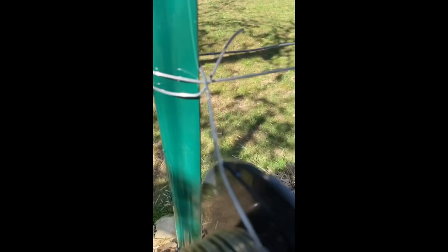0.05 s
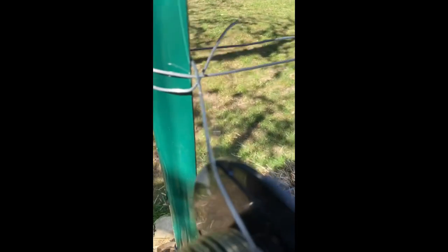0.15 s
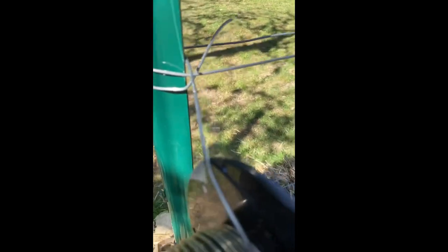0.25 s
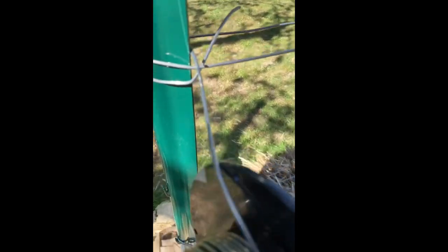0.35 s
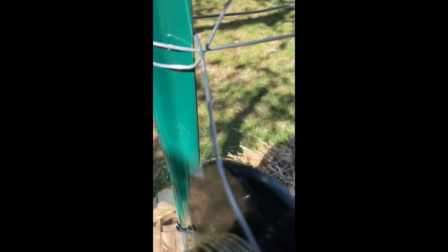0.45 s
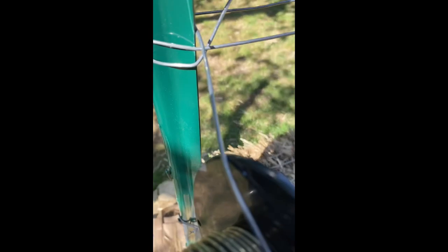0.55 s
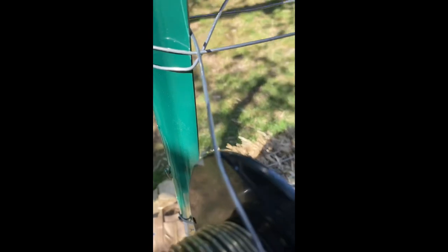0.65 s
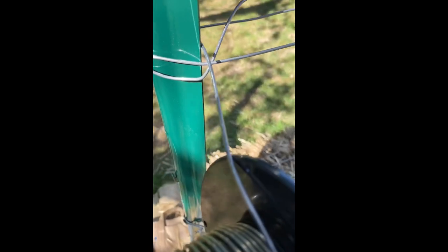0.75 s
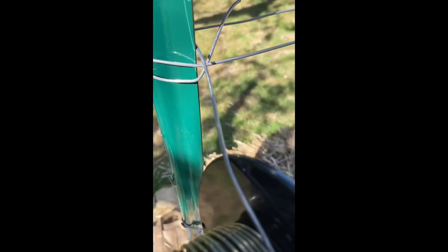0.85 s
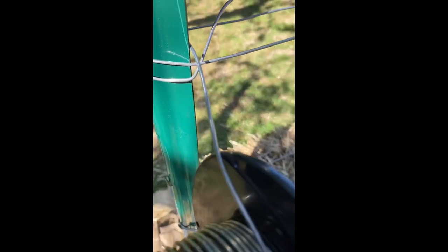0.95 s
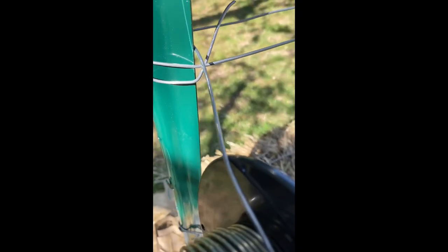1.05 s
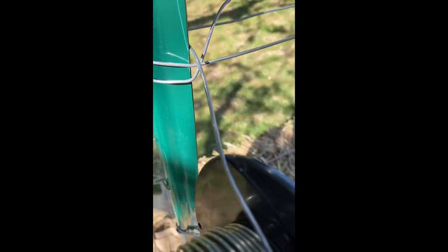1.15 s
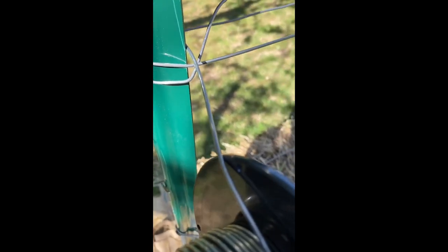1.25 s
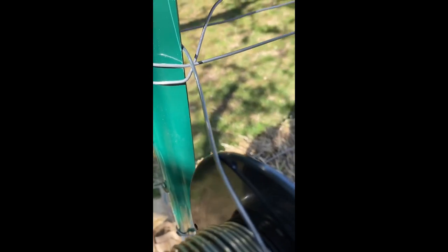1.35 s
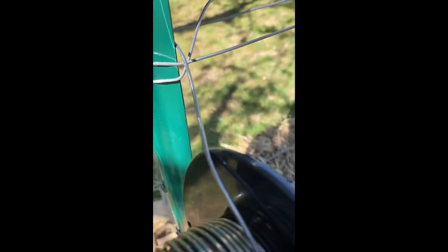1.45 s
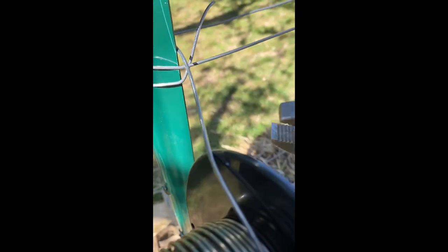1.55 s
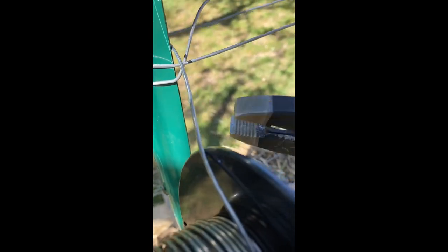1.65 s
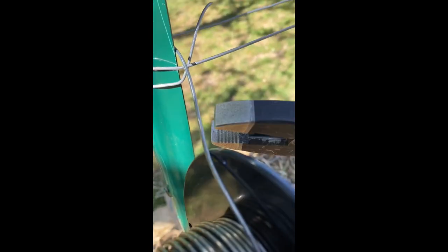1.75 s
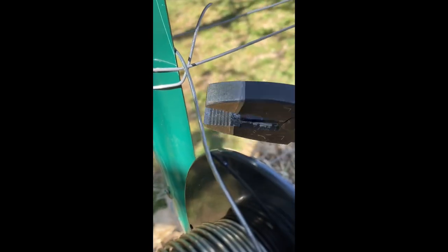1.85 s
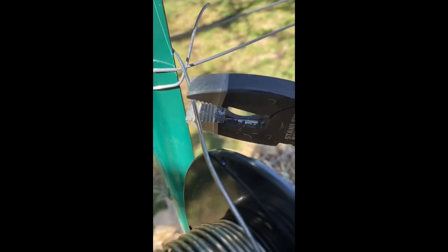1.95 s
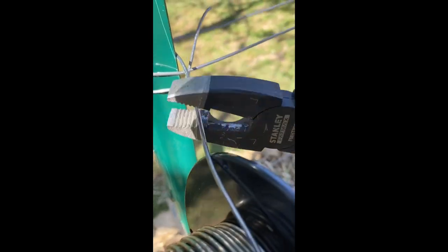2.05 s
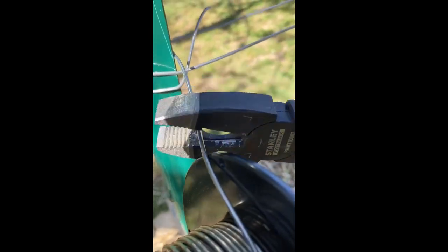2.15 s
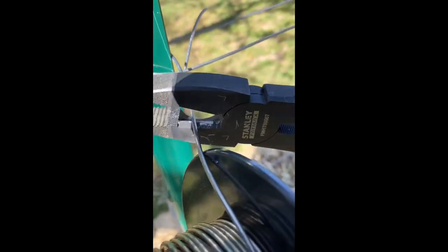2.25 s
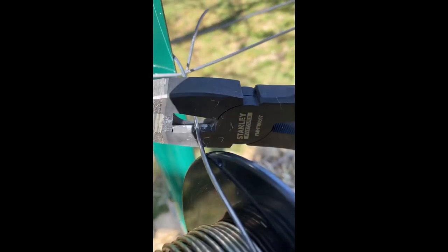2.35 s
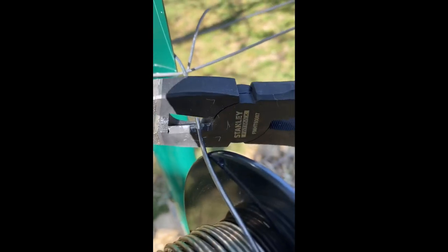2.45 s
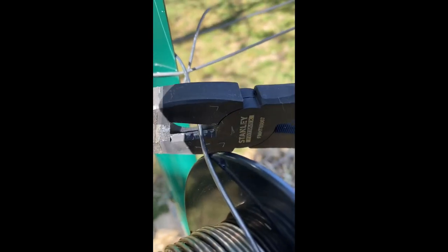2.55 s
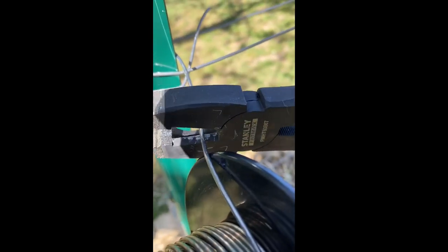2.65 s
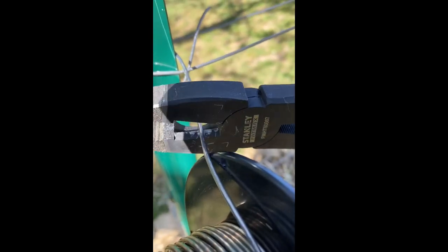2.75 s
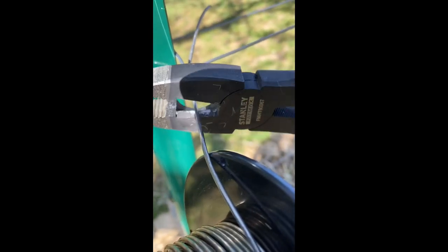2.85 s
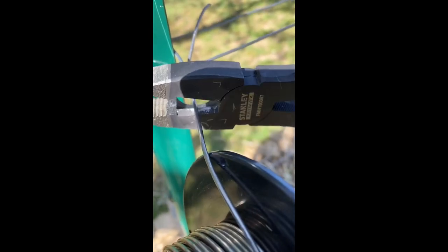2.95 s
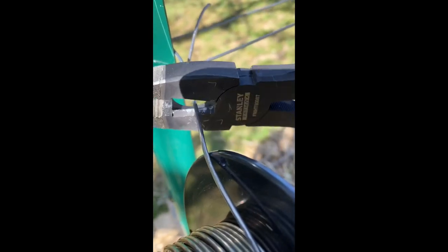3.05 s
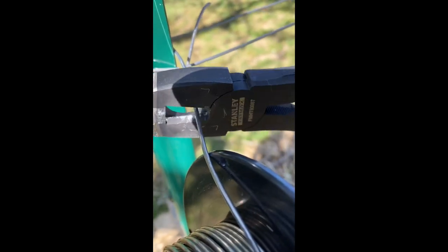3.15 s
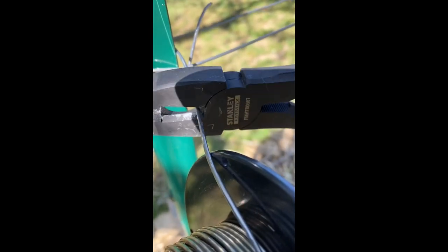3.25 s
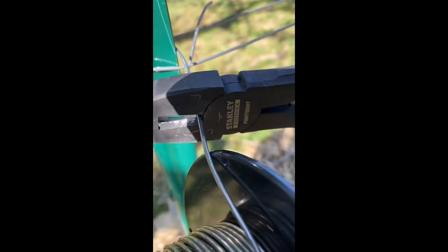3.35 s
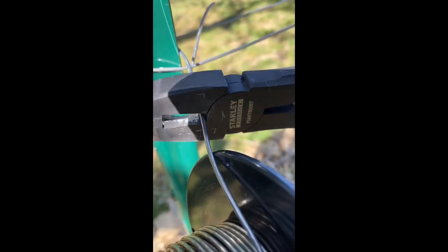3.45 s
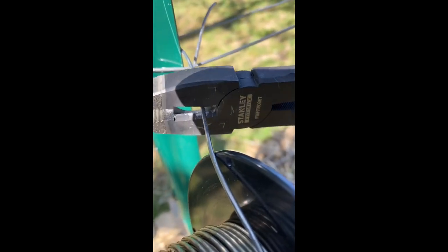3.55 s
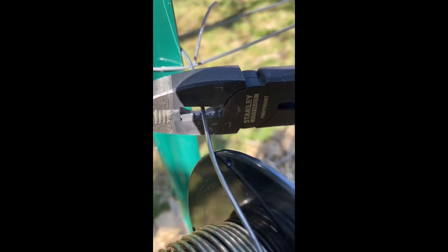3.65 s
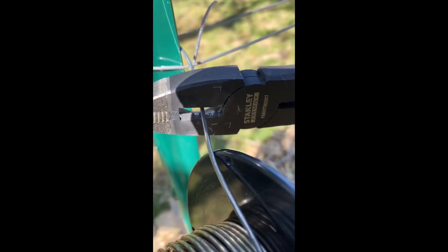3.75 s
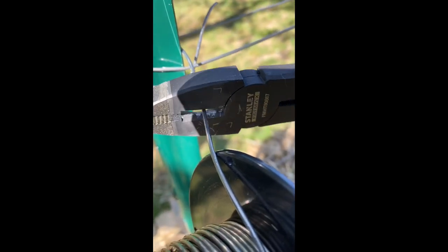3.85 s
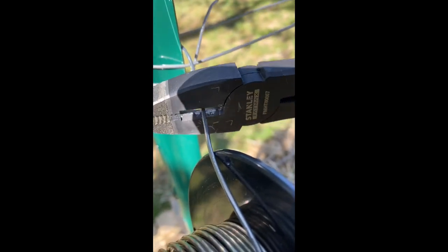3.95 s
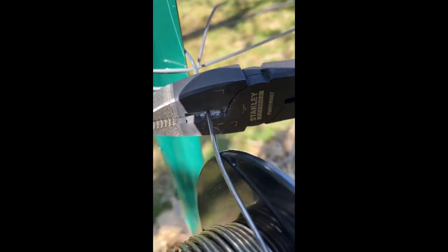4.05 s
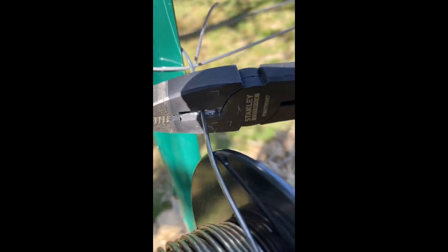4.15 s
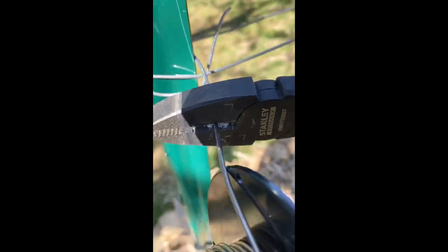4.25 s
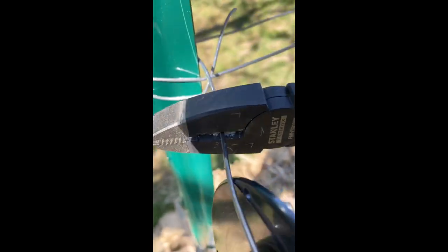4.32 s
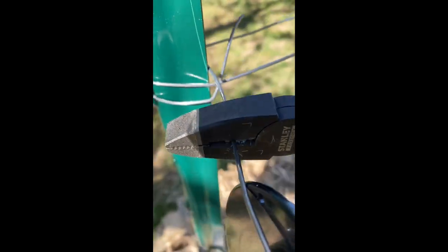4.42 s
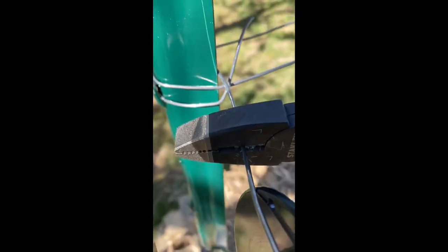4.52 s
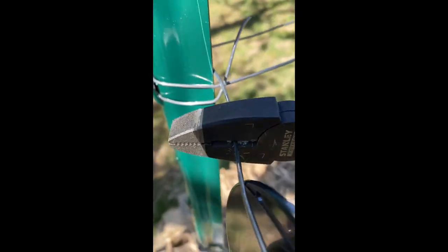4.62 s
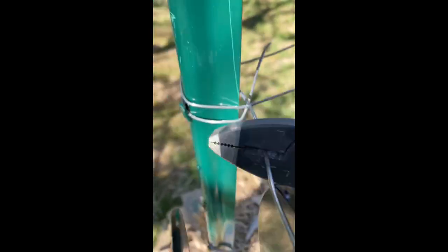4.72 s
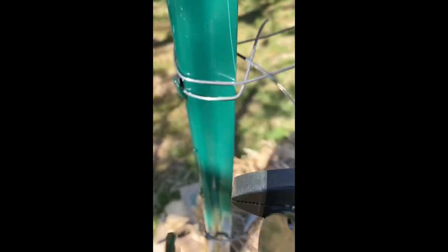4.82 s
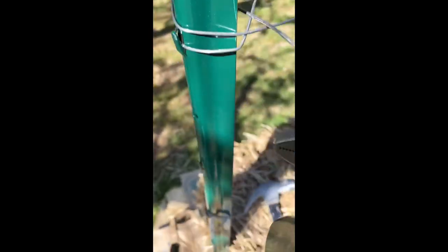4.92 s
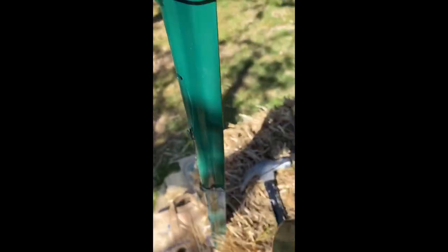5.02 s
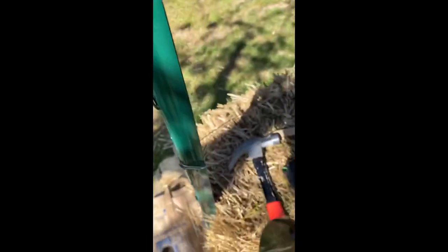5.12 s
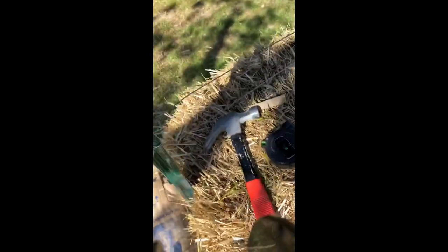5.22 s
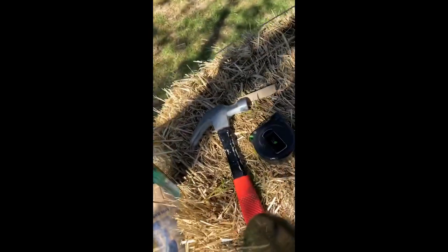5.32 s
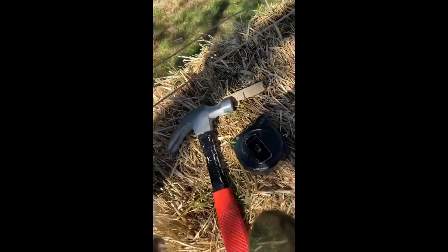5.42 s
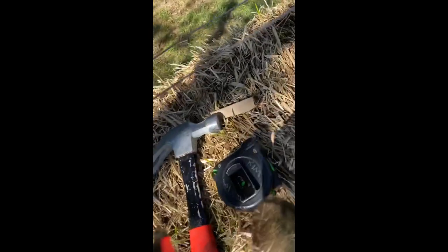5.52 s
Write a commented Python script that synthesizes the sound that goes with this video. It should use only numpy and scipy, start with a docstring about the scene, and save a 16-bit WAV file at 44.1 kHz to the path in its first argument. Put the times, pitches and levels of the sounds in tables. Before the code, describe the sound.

Quiet breeze and small metallic ticks as jaws grip a taut wire, then a violent bright crack with a low thump and fading wiry shimmer.

```python
"""A steel fence wire parts in the jaws of pliers with one loud snap: damped modes, crack noise and a low thump.
The freed fence then sings on as a bank of slowly decaying, wavering modes with a denser wash beneath.
Jaw knocks and gritty scrapes, made of shaped noise and pings, also ring the metal post beside the wire.
Behind them lie a soft rustle, low rumbles and a light breeze of filtered noise, outdoors by a hand-held phone.
Gain control ducks the level at once and lets it recover steadily."""
import sys
import numpy as np
from scipy import signal
from scipy.fft import rfft, irfft, next_fast_len
from scipy.io import wavfile
from scipy.ndimage import uniform_filter1d

SR = 44100
rng = np.random.default_rng(int(sys.argv[2]) if len(sys.argv) > 2 else 0)


def pcm_store(signal):
    """Save signal as 16-bit PCM."""
    levels = np.round(np.clip(np.atleast_2d(signal), -1, 1) * 32767)
    wavfile.write(sys.argv[1], SR, levels.astype(np.int16).T)


N = 246189
T = np.arange(N) / SR  # time, s
TOP_HZ = 16000  # upper band limit


# The wire cracks, yields and parts, and the jaws slam shut and chatter:
# start_s [s], ring_db [dB, before uneven striking], crack_db [dB, before a 2.5 dB cut], crack_t60_s [s]
BREAK_STAGES = [(4.7492, -27, -19, 0.02), (4.7553, -21.5, -29.5, 0.019), (4.7599, -12, -12.5, 0.032),
                (4.7622, -7.5, 4, 0.055), (4.7665, -0.5, 5, 0.096), (4.7721, -4, -7.5, 0.035),
                (4.7793, -7, -5.5, 0.053), (4.7875, -14, -15, 0.038)]
# Modes of the pliers: frequency_hz [Hz], relative_level_db [dB], t60_s [s]
PLIERS_MODES = [(3490, -6.5, 0.11), (3564, -7.5, 0.2), (3940, -6.5, 0.08), (4120, -4, 0.11),
                (4300, -3, 0.13), (4470, -4.5, 0.096), (4640, 7, 0.097), (4660, 1, 0.076), (4600, -9.5, .1),
                (5040, 0.5, 0.076), (5270, -9, .09), (5590, -10.5, 0.12), (5960, -9, 0.11),
                (6140, -7.5, .08), (6520, -8.5, .11), (7000, -12, .1), (7558, -10.5, 0.082),
                (12000, -10.5, .08), (12200, -9.5, .08), (14424, -7, .08), (14680, -6.5, .1),
                (14930, -7, .1), (15550, -12.5, .09)]
# Spectrum of the breaking wire: frequency_hz [Hz], relative_density_db [dB per Hz]
CRACK_SPECTRUM = [(300, 0), (700, -5), (1200, -3.5), (2100, -3), (3150, -6.5), (3500, 1.5), (4400, 4.5),
                  (5500, 4), (7300, 0), (8500, -12), (11000, -12), (12200, 10), (13200, -12.5), (14800, 10),
                  (16000, -10)]


def cut(span_db=-11, size=SR // 4):
    """Impulsive fracture: each stage excites the jaw modes afresh, and its crack rings the short wire span."""
    jaws, cracks = np.zeros((2, 2, N))
    for start_s, ring_db, crack_db, t60 in BREAK_STAGES:
        jaw_ring = ring(struck(PLIERS_MODES, spread_db=2.0), size)
        add(jaws, start_s, undb(ring_db) * jaw_ring)
        crack = fade(t60, size) * noise(CRACK_SPECTRUM, size)
        add(cracks, start_s, undb(crack_db - 2.5) * crack)
    wire_span = resonate(cracks, speckle(count=160, t60=0.014))
    return jaws + cracks + undb(span_db) * wire_span


# The freed wire jolts the post and the hand: frequency_hz [Hz], relative_level_db [dB], t60_s [s]
JOLT_MODES = [(77, -17.5, 0.23), (171, -18, 0.14), (207, 7.5, 0.048), (266.5, 0.5, 0.068),
              (337, -11.5, 0.069), (450, 3, 0.046), (641.6, -5.5, 0.053), (900, -22, 0.037)]
JOLT_S, JOLT_DB = 4.7657, -5  # start, s; gain, dB


def jolt(size=SR // 3):
    """Step release of tension: the low modes all start from rest, in phase, as a short thump."""
    out = np.zeros((2, N))
    thump = np.zeros(size)
    for hz, db, t60 in JOLT_MODES:
        thump += undb(db) * fade(t60, size) * np.sin(2 * np.pi * hz * T[:size])
    add(out, JOLT_S, undb(JOLT_DB) * np.array([thump, thump]))
    return out


# Modes of the taut fence: frequency_hz [Hz], relative_level_db [dB], t60_s [s]
FENCE_MODES = [(1517, -1, 0.99), (1666, -4.5, 1), (1769, 1.5, 1), (1900, -1.5, 1), (2200, -1, .9),
               (2364, -4, 0.91), (2787, 1.5, 0.98), (3085, -3.5, 1), (3355, -0.5, 1), (3480, 4.5, 1),
               (3470, -4, 1.2), (3650, 0, .9), (3924, -2.5, .9), (5700, -1, 0.83), (6132, 2, 1.1),
               (6330, -4, 1), (6573, -8.5, 1.3)]
# The fence's dense weaker modes: frequency_hz [Hz], relative_density_db [dB per Hz]
FENCE_WASH_SPECTRUM = [(600, -31), (1300, -7), (1800, -2.5), (2400, 0.5), (2850, -4), (3150, -3.5),
                       (3500, 5), (4200, -1), (5200, -3), (6400, 0.5), (8000, -21.5), (11000, -48.5),
                       (14500, -4), (16000, -25)]
# After the cut the phone is drawn away from the fence: start, s; speed, m/s; starting distance, m
LEAVE_S, LEAVE_M_PER_S, FENCE_M = 4.855, 0.42, 0.26


def twang(lines_db=-31.5, wash_db=-27, wash_t60=0.7, spread_s=0.37, detune=0.02, size=SR):
    """Free modal decay: slightly detuned strands swell as the shake spreads, waver, and fall as 1/distance."""
    sway_s, sways_per_s = 0.00004, 25  # sway as a random delay, s, and its new values per second
    neighbours = []
    for hz, db, t60 in FENCE_MODES:
        neighbours.append((hz * (1 + detune * rng.standard_normal()), db - 5.0, t60))
    t = T[:size]
    sway = sway_s * np.interp(t * sways_per_s, np.arange(size), rng.standard_normal(size))
    steady_lines = ring(FENCE_MODES + neighbours, size)
    lines = np.array([np.interp(t + sway, t, channel) for channel in steady_lines])
    wash = noise(FENCE_WASH_SPECTRUM, size) * fade(wash_t60, size)
    strands = undb(lines_db) * lines + undb(wash_db) * wash
    out = np.zeros((2, N))
    add(out, JOLT_S, strands * (1 - np.exp(-t / spread_s)))
    distance_m = FENCE_M + LEAVE_M_PER_S * np.maximum(T - LEAVE_S, 0)
    return out * FENCE_M / distance_m


# Modes of the post with its wire ties: frequency_hz [Hz], relative_level_db [dB], t60_s [s]
POST_MODES = [(856, -4, 0.54), (1123, -2, .2), (1520, -4, .28), (2450, 4, 0.095), (2740, 2.5, .25),
              (3150, 3.5, .28), (3400, -7.5, 0.23), (3590, -6, .13), (3730, -4.5, 0.23), (4021, -5.5, .18),
              (4270, -5, .2), (5512, -8, .16), (5900, -6, .14), (6245, -6.5, .14)]


def post_ring(scrapes, snap, scrape_db=-18, cut_db=-43):
    """Forced vibration: scrapes and cut drive the post by convolution with its modal response."""
    drive = undb(scrape_db) * scrapes + undb(cut_db) * snap
    return resonate(drive, ring(POST_MODES, size=SR // 2))


def held_fence(knocks_passed, scrapes, held_db=-11, held_t60=0.36):
    """Damped diffuse response: gripped by the jaws, the fence answers as briefly decaying noise."""
    drive = knocks_passed + undb(-5.5) * scrapes
    response = rng.standard_normal((2, SR)) * fade(held_t60, size=SR)
    return undb(held_db) * resonate(drive, response)


# Jaws and wire knocking and catching on wire and post; each ping has the pitch of the wire length struck:
# start_s [s], level_db [dB], low_db [dB re level, before a 2.5 dB cut],
# treble_db [dB re level, before a 3 dB cut], t60_s [s], ping_hz [Hz], ping_db [dB re level],
# passed_db [dB re level, share passed to fence, and to the post before its common gain]
KNOCKS = [(0.105, -50, 1.5, -8, 0.052, 6250, 3.5, -18), (0.1749, -55.5, -2, -1, 0.05, 2970, -3, -11),
          (0.284, -59, -7, 4, 0.1, 6450, -6, -2), (0.549, -51, 10, -6, 0.052, 3360, 2, -15),
          (0.5656, -41, 5, -10, 0.022, 6070, -7, -2), (0.5702, -47.5, 7.5, -15, 0.02, 1140, -2, 4),
          (0.6246, -39, 0, -16, 0.023, 6180, -7, -3.5), (1.027, -67.5, 7, 1, 0.032, 4900, 3, 6),
          (1.275, -68, -12, -1, 0.12, 5000, 4, -9), (2.043, -26, -2, -1, 0.0093, 6320, -5, -3),
          (2.0465, -39, -6, -7, 0.062, 2620, 7, -5), (2.0632, -29.5, -1, -17, 0.025, 3470, -4, -2),
          (2.069, -35.5, -2, -12, 0.014, 1127, 8, -12), (2.0769, -38.5, -11, 3.5, 0.048, 3600, 3, -22),
          (2.1, -53, -9, 0, .04, 3500, -2, 18), (2.2475, -25, -5, -4.5, 0.017, 6090, -8, -14),
          (2.2626, -48, 2, -14, .025, 2450, -11, -4), (2.271, -53, -1, -8, 0.022, 3650, -5, 1),
          (2.287, -52, -9, -2, 0.026, 1135, -8, -3), (2.3374, -48, -0.5, -22, 0.026, 3630, 2, 11.5),
          (2.426, -46.5, -2.5, -9, 0.14, 3550, -4, 5), (2.456, -55, -9, 17, 0.018, 4000, 9, -8),
          (2.4646, -51, 6, 13, 0.028, 5270, 6, -13), (2.4787, -58, -28.5, 19, 0.043, 4100, 0, 4.5),
          (2.5043, -53, -10, 0, 0.018, 4070, 6, 9), (2.5876, -53.5, -25.5, 1, 0.07, 3490, 5, -3),
          (2.6078, -44.5, -8, -7, 0.06, 3450, -1, 2.5), (3.5445, -50, -14, -11, 0.051, 3500, 4, -14),
          (3.8235, -49, 3, -26, 0.028, 3640, -12, 5.5), (4.2792, -56.5, 8.5, -9, 0.015, 523, 13.5, -17),
          (4.4248, -38, -15, -1.5, 0.082, 2230, -13, -5),
          (4.438, -29.5, -18, -3.5, 0.053, 2240, -9.5, -11.5),
          (4.4443, -28, -25.5, -5, 0.029, 4320, -5, -11), (4.4525, -41.5, -9, -25, 0.054, 3520, 5, -12.5),
          (4.54, -43.5, -9, -8, 0.012, 5550, -9, -12), (4.6491, -46.5, -4, -22, 0.11, 2280, -13, 0),
          (4.6576, -35.5, -20, 2, 0.018, 3610, -18, -24), (4.7028, -48.5, -7, -10, 0.095, 3360, -1, -12),
          (4.7287, -32.5, -12, -1, 0.12, 4860, -10, -10), (4.826, -28, 5, -15, 0.025, 2400, 0.5, -24),
          (4.833, -27.5, 1.5, -20, 0.04, 1620, -3.5, -17.5)]
# Spectrum of the post wall, the low band: frequency_hz [Hz], relative_density_db [dB per Hz]
POST_WALL_SPECTRUM = [(200, -17), (400, -8.5), (620, -9.5), (820, 5), (1130, 0), (1300, -11.5), (1560, 3),
                      (1800, -7), (2100, -11), (2600, -41.5)]
# Spectrum of the steel jaw edge, the treble band: frequency_hz [Hz], relative_density_db [dB per Hz]
JAW_EDGE_SPECTRUM = [(6500, -13), (8000, -22), (11000, -10), (12200, 10), (13200, -3.5), (14600, 11.5),
                     (16000, -5), (17000, -40)]
PING_T60_S = 0.024


def contacts(soft=0.034, span_db=-9, post_db=-11.0, size=SR // 4):
    """Impact excitation: gritty chatter with a ping rings wire span and post; also returns the fence's share."""
    out, passed_on = np.zeros((2, 2, N))
    wire_spectrum = [(1900, -9), (2300, 1.5), (2480, -5.5), (2680, 1.5), (2950, -9), (3250, -6), (3530, 7),
                     (4100, -3), (4450, 0.0), (5000, -4.5), (5600, -3.5), (6100, 3), (6600, -7.5),
                     (7400, -6.5), (8500, -33.0)]
    grains = grit(grain_db=2, catch_db=0.96)
    for start_s, db, low_db, treble_db, t60, ping_hz, ping_db, passed_db in KNOCKS:
        chatter = undb(low_db - 2.5) * noise(POST_WALL_SPECTRUM, size)
        chatter = chatter + noise(wire_spectrum, size)
        chatter = chatter + undb(treble_db - 3.0) * noise(JAW_EDGE_SPECTRUM, size)
        # a longer knock also rises more slowly
        knock = fade(t60, size, rise=soft * t60) * chatter * grains[int(start_s * SR):][:size]
        span = resonate(knock, speckle(count=44, t60=0.03, size=SR // 40))[:, :size]
        knock = knock + undb(span_db) * span
        ping_modes = [(ping_hz, 0, PING_T60_S), (ping_hz * 1.025, -5, PING_T60_S)]
        ping = undb(ping_db) * ring(ping_modes, size)
        add(out, start_s, undb(db) * (knock + ping))
        post = resonate(knock, ring(struck(POST_MODES, spread_db=-1), size))
        add(out, start_s, undb(db + passed_db + post_db) * post)
        add(passed_on, start_s, undb(db + passed_db) * knock)
    return out, passed_on


# Strokes of the jaws sliding along the wire: start_s [s], held_s [s], level_db [dB],
# low_db [dB re level, before the common wall gain], treble_db [dB re level, before a 10.5 dB cut]
SCRAPE_STROKES = [(2.09, 0.014, -50.5, -8, -6.5), (2.258, 0.046, -49, -2.5, -2.5),
                  (2.315, 0.016, -59, -1, -30), (2.46, 0.059, -56, -13, 1.5), (2.555, 0.02, -58, 0.5, -6),
                  (2.597, 0.027, -59, -15, -5), (2.745, 0.035, -61.5, 0, -3),
                  (3.31, 0.039, -60.5, -0.5, -2), (3.355, 0.082, -73, 0, -2.5),
                  (3.466, 0.04, -66, 4.5, -11), (3.565, 0.03, -56, 0.5, -8), (3.692, 0.019, -72, -8, -3)]
# Spectrum of sliding steel: frequency_hz [Hz], relative_density_db [dB per Hz]
SLIDE_SPECTRUM = [(900, -20.5), (1950, -4.5), (2400, 5), (2690, 5), (2950, -8), (3250, 4), (3600, 12.5),
                  (3950, 3.5), (4350, 5.5), (4900, -5), (5400, 3.5), (6600, -2.5), (7500, -3),
                  (8500, -52.5), (11000, -36.5), (16000, -35.5)]


def slide(span_db=-2, wall_db=-4, lead_s=0.05, size=SR // 4):
    """Sliding friction: gritty noise strokes each excite another span of wire and so another colour."""
    out = np.zeros((2, N))
    grains = grit(grain_db=2, catch_db=4)
    for start_s, held_s, db, low_db, treble_db in SCRAPE_STROKES:
        begin_s = start_s - lead_s  # leaves room for the swell
        rub = undb(wall_db + low_db) * noise(POST_WALL_SPECTRUM, size)
        rub = rub + noise(SLIDE_SPECTRUM, size)
        rub = rub + undb(treble_db - 10.5) * noise(JAW_EDGE_SPECTRUM, size)
        friction = grains * strokes([(start_s, held_s, db)])
        rub = rub * friction[int(begin_s * SR):][:size]
        span = resonate(rub, speckle(count=70, t60=0.04, size=SR // 30))[:, :size]
        add(out, begin_s, rub + undb(span_db) * span)
    return out


# The wire sticks and slips in the jaws:
# start_s [s], length_s [s], pitch_hz [Hz], width_hz [Hz], level_db [dB, before a 1.5 dB cut]
SQUEAK_BURSTS = [(2.061, 0.039, 1130, 88, -41.5), (2.269, 0.073, 1120, 70, -60),
                 (2.447, 0.071, 4180, 1100, -50), (3.484, 0.033, 3400, 170, -62),
                 (3.545, 0.02, 3530, 260, -48)]


def squeaks():
    """Stick-slip: each brief burst is noise confined to one narrow resonance of the gripped wire."""
    out = np.zeros((2, N))
    for start_s, length_s, hz, width, db in SQUEAK_BURSTS:
        size = int(length_s * SR)
        resonance = [(hz - 2 * width, -35), (hz - width / 2, -3), (hz, 0),
                     (hz + width / 2, -3), (hz + 2 * width, -35)]
        tone = noise(resonance, size=SR // 4)
        burst = tone[:, :size] * signal.windows.hann(size)
        burst = burst / burst.std(axis=1, keepdims=True)
        add(out, start_s, undb(db - 1.5) * burst)
    return out


# The hand shifts its grip: start_s [s], held_s [s], level_db [dB]
RUSTLE_STROKES = [(0, 0.81, -69.5), (.13, 0.2, -68), (3.87, 0.0099, -63.5), (4.12, 0.66, -71.5),
                  (4.34, 0.15, -81.5), (5.47, 0.07, -70)]
# Spectrum of that rustle: frequency_hz [Hz], relative_density_db [dB per Hz]
RUSTLE_SPECTRUM = [(600, 9), (2000, 1), (3500, -2.5), (5000, -2), (7000, -5.5), (8500, -28.5), (11000, -30),
                   (12500, -8.5), (15000, -6), (16000, -6)]


def rustle():
    """Dry friction without resonance: the shifting hand gives a fine, grainy hiss."""
    envelope = strokes(RUSTLE_STROKES, bite_db_per_s=214.0, release_db_per_s=165.5)
    return noise(RUSTLE_SPECTRUM) * grit(grain_db=1, catch_db=2.0) * envelope


# Soft low buffets on the microphone: start_s [s], length_s [s], level_db [dB]
BUFFET_PUFFS = [(0.078, 0.03, -44), (0.127, 0.02, -42), (1.76, 0.021, -40.5), (1.782, 0.11, -43.5),
                (1.94, 0.066, -49), (2.916, 0.064, -44.5), (2.967, 0.14, -44.5), (4.273, 0.038, -46.5),
                (4.83, 0.015, -34)]


def buffets(steady_db=-66, shake_db=-8):
    """Low-frequency pressure noise: air puffs, a constant hand tremble, and more shaking with each scrape."""
    rumble = noise([(20, -50.0), (45, 1.0), (70, 4), (110, 3.0), (190, -8.0), (350, -21.0),
                    (700, -35.5), (2000, -81.5)])
    shake = strokes(SCRAPE_STROKES, bite_db_per_s=124, release_db_per_s=307.5)
    out = rumble * (undb(steady_db) + undb(shake_db) * shake)
    for start_s, length_s, db in BUFFET_PUFFS:
        i, size = int(start_s * SR), int(length_s * SR)
        puff = rumble[:, i:i + size] * signal.windows.tukey(size)
        add(out, start_s, undb(db) * puff / puff.std(axis=1, keepdims=True))
    return out


# Spectrum of the open air: frequency_hz [Hz], relative_density_db [dB per Hz]
AIR_SPECTRUM = [(20, -26), (40, 4), (60, -0.5), (190, -4.5), (320, -8), (570, -13.5), (1000, -13.5),
                (2400, -36.5), (4500, -44), (7500, -51), (9000, -69.5), (16000, -59)]
# The breeze freshens slowly, then drops as the phone turns down towards the ground
AIR_DB, AIR_RISE_DB_PER_S = -57, 0.5  # level at the start, dB; slope, dB/s
TURN_S, TURN_LENGTH_S, SHELTER_DB = 4.754, 0.6, -14.5  # start, s; duration, s; change, dB


def air(flutter_db=1.22):
    """Broadband turbulence: filtered noise wavers at random, rises slowly, and is sheltered by the turn."""
    knots = np.arange(0, T[-1] + 1, 1 / 12)  # s
    waver = np.interp(T, knots, rng.standard_normal(len(knots)))
    turned = np.clip((T - TURN_S) / TURN_LENGTH_S, 0, 1)
    level_db = AIR_DB + AIR_RISE_DB_PER_S * T + flutter_db * waver + SHELTER_DB * turned
    return noise(AIR_SPECTRUM) * undb(level_db)


def undb(db):
    """Logarithmic level: decibels to amplitude gain."""
    return 10 ** (np.asarray(db) / 20)


def colour(x, points, keep_power=True):
    """Linear filtering by a (Hz, dB) spectrum; keep_power preserves the power of white noise."""
    size = next_fast_len(x.shape[-1] + 2048)
    hz, db = np.transpose(points)
    log_bins = np.log(np.fft.rfftfreq(size, 1 / SR) + 1)
    gain = undb(np.interp(log_bins, np.log(hz), db))
    if keep_power:
        gain = gain / np.sqrt(np.mean(gain ** 2))
    return irfft(rfft(x, size) * gain, size)[..., :x.shape[-1]]


def noise(points, size=N):
    """Random excitation: independent mid and side noises of near unit rms with a given spectrum."""
    return colour(rng.standard_normal((2, size)), points)


def fade(t60, size, rise=0.00025):
    """Exponential damping: quick rise, then a 60 dB fall in t60 seconds."""
    return (1 - np.exp(-T[:size] / rise)) * 1000 ** (-T[:size] / t60)


def ring(modes, size):
    """Modal superposition: decaying sines of random phase, scaled to unit rms before rise and decay."""
    phases = rng.uniform(0, 2 * np.pi, (len(modes), 2, 1))
    out = np.zeros((2, size))
    for (hz, db, t60), phase in zip(modes, phases):
        out += undb(db) * fade(t60, size) * np.sin(2 * np.pi * hz * T[:size] + phase)
    return out / np.sqrt(sum(undb(db) ** 2 for _, db, _ in modes) / 2)


def struck(modes, spread_db):
    """Point excitation: one place of contact drives each mode a little more or less."""
    uneven = rng.uniform(-1, 1, len(modes))
    return [(hz, db + spread_db * u, t60) for (hz, db, t60), u in zip(modes, uneven)]


def speckle(count=260, t60=0.03, size=SR // 12):
    """High modal density: the gripped wire span has many close, damped modes of uneven strength."""
    place, strength = rng.random((2, count))
    hz = (np.arange(count) + place) * TOP_HZ / count
    modes = [(f, 20 * np.log10(a + 0.1), t60) for f, a in zip(hz, strength)]
    return ring(modes, size)


def resonate(drive, response):
    """Convolution: a drive passes through an impulse response scaled to unit energy."""
    response = response / np.sqrt(np.sum(response ** 2, axis=1, keepdims=True))
    return signal.fftconvolve(drive, response, axes=1)[:, :N]


def strokes(rows, bite_db_per_s=752.5, release_db_per_s=597):
    """Exponential growth and decay: the gain of each stroke swells, holds and dies away."""
    total = np.zeros(N)
    for start_s, held_s, db, *_ in rows:
        before_db = bite_db_per_s * np.maximum(start_s - T, 0)
        after_db = release_db_per_s * np.maximum(T - start_s - held_s, 0)
        total += undb(np.maximum(db - before_db - after_db, -200))
    return total


def grit(grain_db, catch_db):
    """Random friction force: millisecond grains that catch and ease every few milliseconds, at unit rms."""
    fine = np.repeat(rng.standard_normal(N // 50 + 1), 50)[:N]
    coarse = np.interp(T * 150, np.arange(N // 250), rng.standard_normal(N // 250))
    grains = undb(grain_db * fine + catch_db * coarse)
    return grains / np.sqrt(np.mean(grains ** 2))


def add(out, start_s, sound):
    """Superposition: mix a sound in at a time."""
    i = int(start_s * SR)
    out[:, i:i + sound.shape[1]] += sound[:, :N - i]


def ports(pair, side_points):
    """Mid-side stereo: filtered side is added to mid on the left and subtracted on the right."""
    side = colour(pair[1], side_points, keep_power=False)
    return np.array([pair[0] + side, pair[0] - side])


# Side filters of the two microphone ports, for near sounds and air: frequency_hz [Hz], gain_db [dB]
NEAR_SIDE_GAIN = [(100, -19.5), (380, -11), (700, -1.5), (1290, -16.5), (2380, -2), (4400, 5), (6500, 1),
                  (8500, 21.5), (11000, 22), (12300, 5), (15000, 1)]
AIR_SIDE_GAIN = [(60, -7.5), (200, -8.5), (380, -6.5), (700, 2.5), (1290, -0.5), (4400, 3), (8000, 8)]


def scene():
    """Coupled sources: cut, knocks and scrapes sound directly and feed the post; the last two feed the fence."""
    snap, scrapes = cut(), slide()
    knocks, knocks_passed = contacts()
    near = snap + jolt() + twang() + post_ring(scrapes, snap) + held_fence(knocks_passed, scrapes)
    near = near + knocks + scrapes + squeaks() + rustle() + buffets()
    return ports(near, NEAR_SIDE_GAIN) + ports(air(), AIR_SIDE_GAIN)


def record(dry, limit_db=-10, release_db_per_s=62, bass_hz=45):
    """Peak-hold limiting: bass is shed, gain drops at once above limit_db and recovers at a fixed dB rate."""
    highpass = signal.butter(3, bass_hz, "highpass", fs=SR, output="sos")
    dry = signal.sosfilt(highpass, dry)
    power = uniform_filter1d(np.mean(dry ** 2, axis=0), size=128)
    level_db = 10 * np.log10(np.abs(power) + 1e-12)
    # a running maximum that falls at the release rate
    held_db = np.maximum.accumulate(level_db + release_db_per_s * T) - release_db_per_s * T
    limited = np.clip(dry * undb(np.minimum(limit_db - held_db, 0)), -1, 1)
    lowpass = signal.ellip(8, 0.2, 70, TOP_HZ, fs=SR, output="sos")
    return signal.sosfilt(lowpass, limited)


dry = scene()
out = record(dry)
pcm_store(out)
```